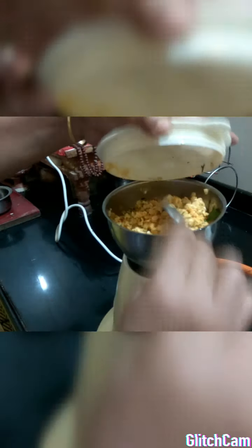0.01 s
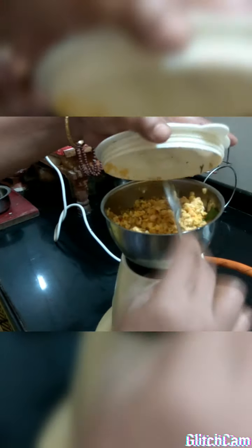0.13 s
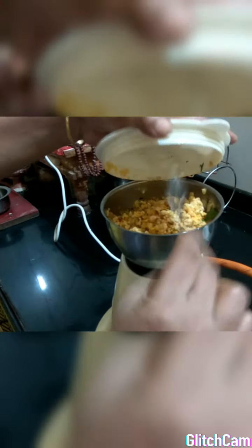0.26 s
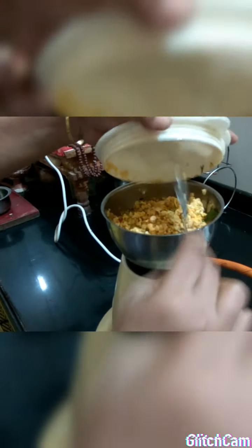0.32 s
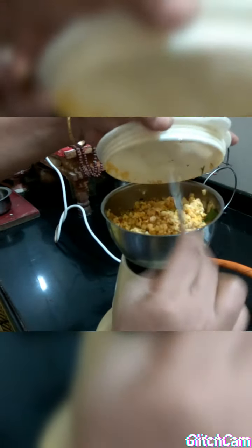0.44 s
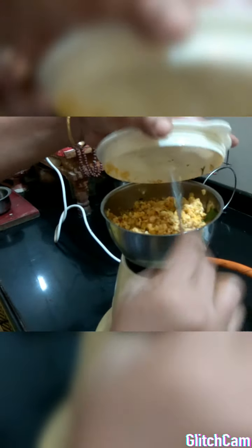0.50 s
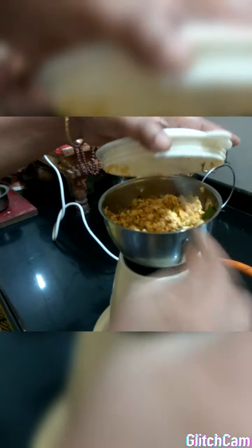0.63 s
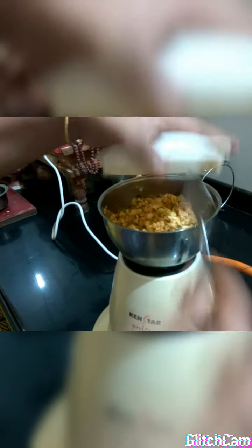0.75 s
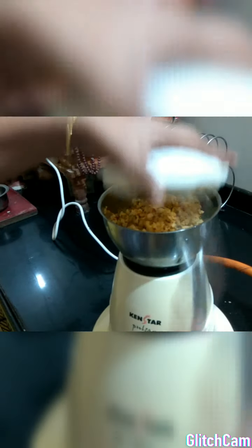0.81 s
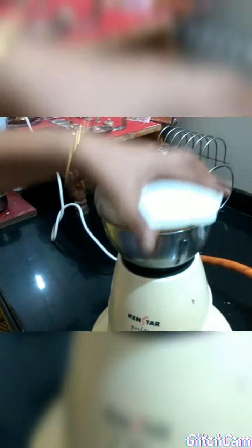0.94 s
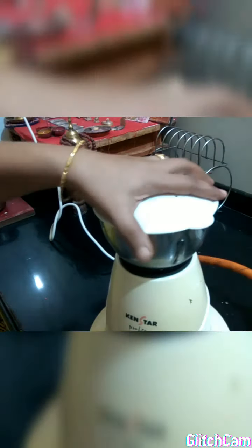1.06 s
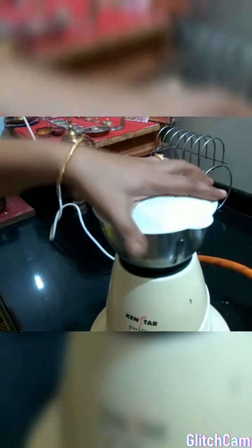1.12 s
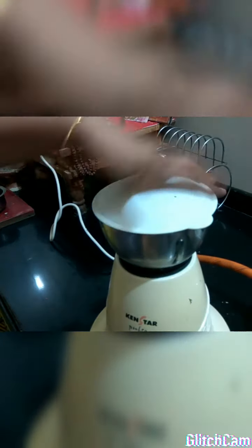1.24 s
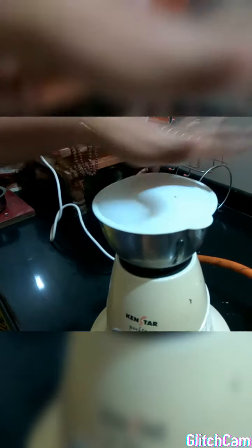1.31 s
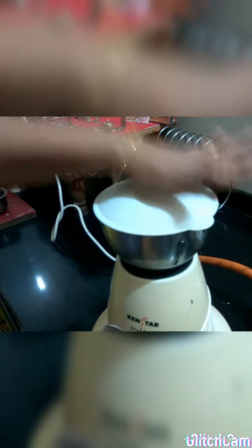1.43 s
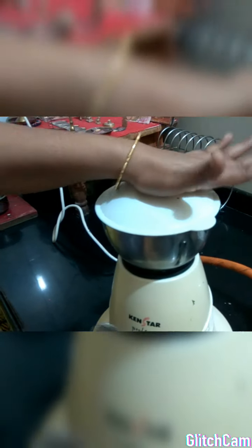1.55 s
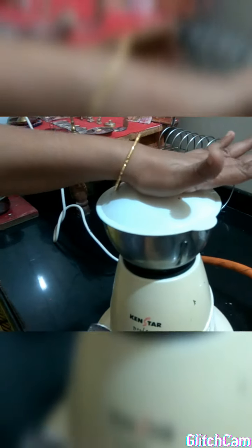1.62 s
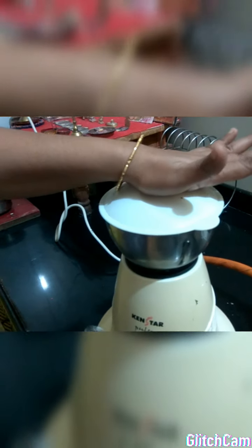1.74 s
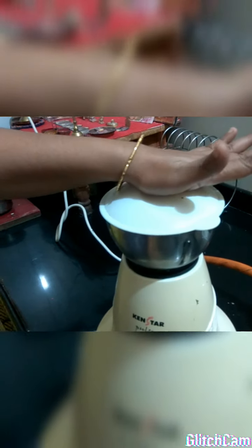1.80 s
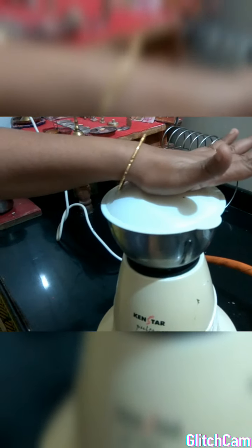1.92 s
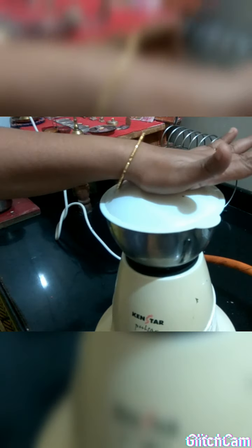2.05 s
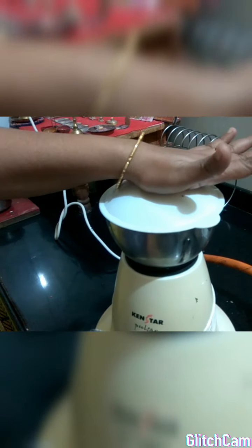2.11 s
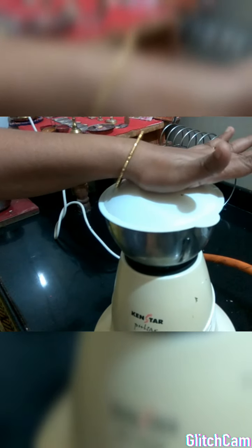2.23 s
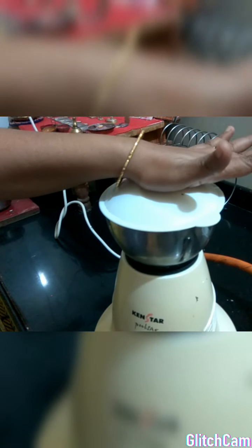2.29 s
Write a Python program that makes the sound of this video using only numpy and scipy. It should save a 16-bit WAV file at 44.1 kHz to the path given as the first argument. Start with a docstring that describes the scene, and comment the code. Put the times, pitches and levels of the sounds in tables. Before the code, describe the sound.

Three sharp spoon knocks on a hollow lid, then the lid clatters and clicks shut on a jar

```python
"""A low, wavering hum and faint hiss run throughout: filtered noise and drifting sine tones.
A steel spoon touches a mixer grinder's jar twice, then knocks three times on the plastic lid over it.
The lid bumps on the jar and snaps into place, close by in a small hard kitchen; the grinder is off.
Contacts are decaying modes plus noise bursts; the room adds early echoes and a diffuse tail."""
import sys
import numpy as np
from scipy import signal
from scipy.fft import rfft, irfft
from scipy.io import wavfile
from scipy.ndimage import uniform_filter1d

SR = 44100
rng = np.random.default_rng(int(sys.argv[2]) if len(sys.argv) > 2 else 0)


def unload_audio(sound):
    """Save the sound as a 16-bit wav file, at the path given as the first command line argument."""
    columns = np.transpose(np.atleast_2d(sound))
    # keep every value between -1 and 1, then stretch to whole-number steps
    steps = np.round(np.clip(columns, -1, 1) * 32767)
    wavfile.write(sys.argv[1], SR, steps.astype(np.int16))


N = 105840  # 2.4 s


def undb(db):
    """Decibels to amplitude gain."""
    return 10 ** (np.asarray(db) / 20)


def along(hz, table):
    """Read a table's second column on a log-frequency axis."""
    table = np.array(table)
    return np.interp(np.log(hz + 1), np.log(table[:, 0]), table[:, 1])


def colour(x, table):
    """Filter x to a (hz, gain_db) curve without phase shift."""
    n = x.shape[-1]
    gain = undb(along(np.fft.rfftfreq(n, 1 / SR), table))
    return irfft(rfft(x) * gain, n)


def stereo_noise(shared_hz, left_db):
    """White noise with bass common to both sides; above it they differ and the left level shifts."""
    hz = np.fft.rfftfreq(N, 1 / SR)
    right, own = rfft(rng.standard_normal((2, N)))
    shared = 1 / (1 + (hz / shared_hz) ** 2)
    left = shared * right + np.sqrt(1 - shared ** 2) * own
    left = left * undb(left_db * (1 - shared))
    return irfft(np.array([left, right]), N)


def walk(rate_hz):
    """Smoothed random drift with a standard deviation of 1."""
    hold = int(SR / rate_hz)
    steps = np.repeat(rng.standard_normal(N)[:N // hold + 1], hold)
    drift = uniform_filter1d(uniform_filter1d(steps, hold), hold)[:N]
    return drift / drift.std()


def add(out, start_s, sound):
    """Mix a sound in at a time."""
    i = int(start_s * SR)
    n = min(sound.shape[1], N - i)
    out[:, i:i + n] += sound[:, :n]


def decay(t_s, t60_s):
    """Exponential fall of 60 dB in t60_s."""
    return np.exp(-np.log(1000) * t_s / t60_s)


LEFT_LAG_S = 0.00017


def ring(modes, rise_cycles, rise_s=0, tilt_db_per_oct=0):
    """Struck modes swell and decay, neighbours in opposite polarity; the left lags slightly."""
    t = np.maximum(np.arange(SR) / SR - np.array([[LEFT_LAG_S], [0]]), 0)
    out = 0
    for k, (hz, db, t60_s, left_db) in enumerate(modes):
        rise = 1 - np.exp(-t / (rise_cycles / hz + rise_s))
        side_db = np.array([[left_db], [0]])
        gain = undb(db + tilt_db_per_oct * np.log2(hz / 700) + side_db)
        out = out + (-1) ** k * gain * rise * decay(t, t60_s) * np.sin(2 * np.pi * hz * t)
    return out


def crack(spectrum, t60_s, left_db, room_db):
    """Contact noise: stereo burst in rows 0-1, bare click to excite the room in row 2."""
    env = decay(np.arange(SR) / SR, t60_s)
    env = env / np.sqrt(np.sum(env ** 2))
    burst = colour(rng.standard_normal((2, SR)), spectrum) * env * undb([[left_db], [0]])
    click = colour(signal.unit_impulse(SR, SR // 500), spectrum)  # centred 2 ms in
    return np.vstack([burst, undb(room_db) * click])


def with_room(sound, room_db):
    """Add row 2: the right-hand sound, scaled, as radiated into the room."""
    return np.vstack([sound, undb(room_db) * sound[1]])


def tone(hz, waver_hz, waver_db):
    """Sine of nominal RMS 1 with randomly drifting pitch and level."""
    phase = 2 * np.pi * np.cumsum(hz + waver_hz * walk(7.4)) / SR
    return np.sqrt(2) * np.sin(phase) * undb(waver_db * walk(9.38))


# hum level over time: time_s, upper_line_db, lower_line_db
HUM_LEVELS = [(0, -50, -60), (.3, -57, -47.5), (.65, -47, -59), (.85, -52, -53.5), (1.05, -50.5, -53),
              (1.3, -53, -61), (1.55, -63, -59), (1.7, -52.5, -54.5), (1.82, -51.5, -67), (2.0, -48.5, -65),
              (2.2, -51, -64), (2.4, -55.5, -77)]
UPPER_HUM_HZ, LOWER_HUM_HZ = 99, 79.2
# faint tones before the left/right offset: pitch_hz, level_db
FAINT_TONES = [(297, -69), (363, -77.5), (446, -70.5), (4000, -82), (5000, -82.5), (8000, -86),
               (14000, -101)]
# room noise and hiss spectrum: freq_hz, gain_db
AIR_SPECTRUM = [(25, -22), (45, -33.5), (75, -37.5), (130, -36.5), (200, -42), (330, -40.5), (600, -50.5),
                (1200, -51.5), (2500, -58), (4600, -59.5), (6500, -67), (8500, -59.5), (10500, -67),
                (14000, -61), (16500, -75)]
# slow level of room noise and hiss: time_s, level_db
AIR_LEVELS = [(0, -0.5), (.9, 2), (1.15, -1), (1.45, 1.5), (1.75, 1), (2.0, -.5), (2.2, -2), (2.4, 0)]
AIR_LEFT_DB, AIR_SHARED_HZ = -5.5, 420


def background():
    """Two drifting hum lines and faint tones over coloured noise whose level moves slowly."""
    t = np.arange(N) / SR
    time_s, upper_db, lower_db = np.array(HUM_LEVELS).T
    hum = undb(np.interp(t, time_s, upper_db)) * tone(UPPER_HUM_HZ, waver_hz=0.62, waver_db=0)
    hum += undb(np.interp(t, time_s, lower_db)) * tone(LOWER_HUM_HZ, waver_hz=1.6, waver_db=0.5)
    tones = sum(undb(db) * tone(hz, waver_hz=2.5, waver_db=1) for hz, db in FAINT_TONES)
    air_db = np.interp(t, *np.array(AIR_LEVELS).T) + 0.5 * walk(3.04)
    air = colour(stereo_noise(AIR_SHARED_HZ, AIR_LEFT_DB), AIR_SPECTRUM) * undb(air_db)
    return hum + tones * undb([[-4], [1.5]]) + air


# spoon touching the steel jar: start_s, level_db
JAR_TAPS = [(0.0669, -17), (0.0982, 1.5)]
# modes of the light touch: pitch_hz, level_db, t60_s, left_minus_right_db
JAR_TAP_MODES = [(262, -42, 0.059, -3), (480, -34.5, 0.029, -5.5), (675, -44, 0.035, -17),
                 (810, -38.5, 0.041, -9), (1165, -40.5, 0.016, -3), (1610, -47, 0.048, -17),
                 (2010, -47.5, 0.04, -10), (2740, -41, 0.0082, -13), (7630, -40, 0.017, -21)]
# spoon contact noise, also used by the knocks: freq_hz, gain_db
SPOON_SPECTRUM = [(300, 4.5), (1500, 2), (2800, 6), (4500, -5), (6500, -5.5), (10000, -7), (12000, -2.5),
                  (15000, 1.5), (17000, -27)]


def spoon_taps():
    """Light steel contact excites short jar modes with a little contact noise."""
    out = np.zeros((3, N))
    for start_s, db in JAR_TAPS:
        jar = with_room(ring(JAR_TAP_MODES, rise_cycles=0.44), room_db=-4)
        contact = crack(SPOON_SPECTRUM, t60_s=0.03, left_db=-9.5, room_db=-1.5)
        add(out, start_s, undb(db) * (jar + undb(-22) * contact))
    return out


# diffuse tail by band: centre_hz, level_db, t60_s
ROOM_BANDS = [(100, 5.5, 0.57), (266, -4.5, 0.45), (470, -1, 0.54), (830, -1.5, 0.52), (1830, -3.5, 0.45),
              (3220, -4.5, 0.41), (5560, -6.5, 0.37), (13000, -11, 0.26)]
# early echoes from counter and walls, before the low-pass: delay_s, right_gain, left_gain
ROOM_ECHOES = [(.0095, 0.049, 0.053), (0.024, 0.09, 0.07), (.043, 0.027, 0.019)]
ROOM_LEFT_DB, ROOM_ONSET_S, ROOM_SHARED_HZ = -6, 0.002, 467
ECHO_TOP_HZ = 2220


def kitchen(radiated):
    """Low-passed early echoes plus a diffuse tail with a separate decay per band."""
    t, hz = np.arange(N) / SR, np.fft.rfftfreq(N, 1 / SR)
    noise = rfft(stereo_noise(ROOM_SHARED_HZ, ROOM_LEFT_DB))
    early = np.zeros((2, N))
    for delay_s, right, left in ROOM_ECHOES:
        add(early, delay_s, np.array([[left], [right]]))
    response = signal.sosfilt(signal.butter(2, ECHO_TOP_HZ, fs=SR, output="sos"), early)
    log_centres = np.log(np.array(ROOM_BANDS)[:, 0])
    onset = 1 - np.exp(-(t / ROOM_ONSET_S) ** 2)
    # each row of the identity picks one band, crossfaded into its neighbours
    for pick, (_, db, t60_s) in zip(np.eye(len(ROOM_BANDS)), ROOM_BANDS):
        env = decay(t, t60_s) * onset
        band = irfft(noise * np.interp(np.log(hz + 1), log_centres, pick), N)
        response = response + undb(db) * band * env / np.sqrt(np.sum(env ** 2))
    return signal.fftconvolve(radiated, response, axes=1)[:, :N]


# spoon on lid: start_s, level_db, relative_crack_db, tilt_db_per_oct
LID_KNOCKS = [(0.2266, -4, 0.5, 0.5), (0.4015, -2, -0.5, 0.5), (0.5596, 0, -1, 0.5)]
# hand-held lid modes: pitch_hz, level_db, t60_s, left_minus_right_db
HELD_LID_MODES = [(247, -20, 0.03, -1.5), (444.6, -6, 0.034, -5), (664, -19, 0.04, -32),
                  (819, -9, 0.017, -10), (1150, -20.5, 0.017, -13), (1486, -25, 0.02, -13),
                  (1607, -20.5, 0.015, -26), (2035, -17, 0.02, -13), (2453, -19.5, 0.021, -14.5),
                  (3550, -31, 0.017, -2)]
# long jar and room resonances: pitch_hz, level_db, t60_s, left_minus_right_db
LONG_RING_MODES = [(73, -26.5, 0.16, -3.5), (101.7, -33, 0.37, 1.5), (263.2, -55, 0.14, 0),
                   (357, -59, 0.27, -12), (414.2, -46, 0.51, -9), (434.5, -40.5, 0.58, -28),
                   (448, -51, 0.34, -1), (472, -58, 0.42, -10), (539.7, -37, 0.39, 6.5),
                   (728.5, -51.5, 1, -9), (786.6, -28.5, 0.24, -6), (810, -38.5, 0.37, -12),
                   (857, -43, 0.7, -3), (1614, -31.5, 0.17, -12), (1660, -36.5, 0.17, -6)]
KNOCK_RISE_CYCLES, LONG_RING_RISE_S = 0.87, 0.01
CRACK_T60_S, STRIKE_SCATTER_DB = 0.022, 1.5


def spoon_knocks():
    """Steel cracks on the lid: a short hollow note and long ring; strike spot varies mode levels."""
    out = np.zeros((3, N))
    long_ring = ring(LONG_RING_MODES, KNOCK_RISE_CYCLES, LONG_RING_RISE_S)
    for start_s, db, crack_db, tilt in LID_KNOCKS:
        modes = np.array(HELD_LID_MODES)
        modes[2:, 1] += STRIKE_SCATTER_DB * rng.standard_normal(len(modes) - 2)  # lowest two stay
        lid = with_room(ring(modes, KNOCK_RISE_CYCLES, tilt_db_per_oct=tilt), room_db=-4.5)
        contact = crack(SPOON_SPECTRUM, t60_s=CRACK_T60_S, left_db=-9.5, room_db=3)
        add(out, start_s, undb(db) * (lid + undb(crack_db) * contact))
        add(out[:2], start_s, undb(db) * long_ring)
    return out


# lid bumping on the rim: start_s, ring_db, tilt_db_per_oct, thud_db
LID_BUMPS = [(1.0065, -16.5, 4.5, -11), (1.0386, -2, 1, -8), (1.1176, -10, 4, 1.5), (1.1378, -10.5, 1, 1),
             (1.716, -26, -9, -11.5)]
# modes of the lid lying on the jar: pitch_hz, level_db, t60_s, left_minus_right_db
RESTING_LID_MODES = [(188, -45, 0.026, 0), (324, -27.5, 0.035, -2), (465, -26, 0.015, -2),
                     (617, -25, 0.021, -31), (795, -27.5, 0.018, -2), (942, -30, 0.023, -1.5),
                     (1690, -40.5, 0.025, -28), (2270, -42, .012, -4), (2780, -40, 0.013, -22)]
# soft contact noise of palm and lid: freq_hz, gain_db
THUD_SPECTRUM = [(70, -19), (140, -1), (260, 3.5), (500, -20), (1000, -5.5), (2000, -20), (2900, -16),
                 (4000, -39), (8000, -34), (16000, -46)]


def lid_bumps():
    """The lid finds the jar: damped lid modes plus dull contact noise."""
    out = np.zeros((3, N))
    for start_s, db, tilt, thud_db in LID_BUMPS:
        lid = ring(RESTING_LID_MODES, rise_cycles=0.5, tilt_db_per_oct=tilt)
        add(out, start_s, undb(db) * with_room(lid, room_db=-2))
        thud = crack(THUD_SPECTRUM, t60_s=0.064, left_db=-7.5, room_db=-1)
        add(out, start_s, undb(thud_db) * thud)
    return out


# lid snapping home: start_s, level_db
LID_SNAPS = [(1.5372, -1), (1.6240, -11.5), (1.674, -28.5), (1.7, -29)]
# tight rim modes: pitch_hz, level_db, t60_s, left_minus_right_db
RIM_MODES = [(357, -29, 0.048, -8.5), (466, -31, 0.015, -27), (784, -47, .015, -13),
             (1350, -31, 0.014, -17), (1735, -31.5, 0.015, -18), (2730, -18.5, 0.024, -19),
             (3550, -19, 0.014, -3.5), (4530, -23, 0.0057, -15), (5540, -36, 0.0097, 7)]
# snap contact noise: freq_hz, gain_db
SNAP_SPECTRUM = [(300, 0), (700, 0.5), (1400, -1), (2200, -7), (3200, -2), (5000, -5), (7000, -4),
                 (9000, -15.5), (13000, -17), (17000, -35)]


def lid_snaps():
    """The rim slips over the edge: bright rim modes plus a very short noise burst."""
    out = np.zeros((3, N))
    rim = with_room(ring(RIM_MODES, rise_cycles=0.3), room_db=-9)
    for start_s, db in LID_SNAPS:
        contact = crack(SNAP_SPECTRUM, t60_s=0.0073, left_db=-11, room_db=-1)
        add(out, start_s, undb(db) * (rim + contact))
    return out


def scene():
    """Direct contacts (rows 0-1) plus the kitchen's answer to row 2, over the background."""
    hits = spoon_taps() + spoon_knocks() + lid_bumps() + lid_snaps()
    return background() + hits[:2] + kitchen(hits[2:])


LOW_CUT_HZ, TOP_HZ = 65, 16300


def record(dry):
    """The recorder drops the deep bass and cuts the top of the treble."""
    low_cut = signal.butter(4, LOW_CUT_HZ, "high", fs=SR, output="sos")
    top_cut = signal.ellip(8, 0.2, 80, TOP_HZ, fs=SR, output="sos")  # 0.2 dB ripple, 80 dB stop
    return signal.sosfilt(top_cut, signal.sosfilt(low_cut, dry))


dry = scene()
out = record(dry)
unload_audio(out)
```